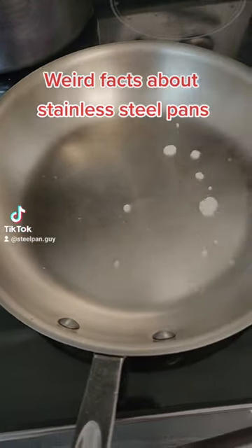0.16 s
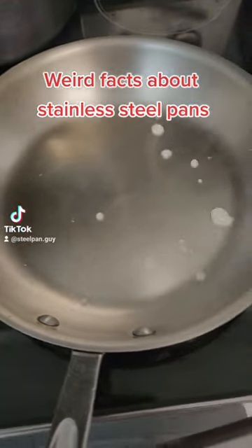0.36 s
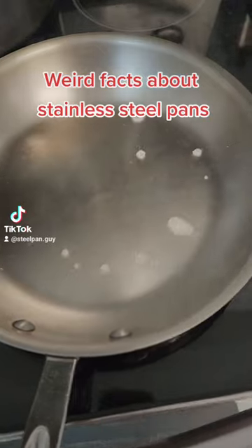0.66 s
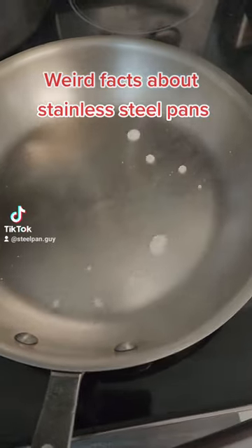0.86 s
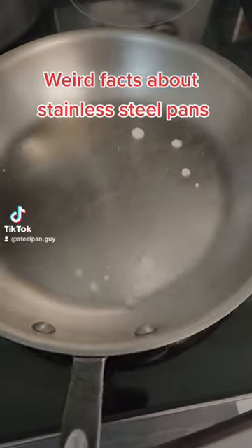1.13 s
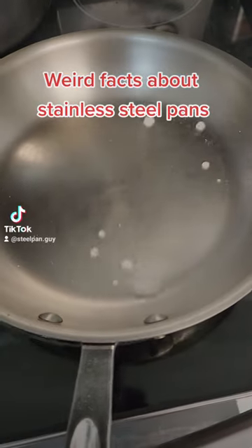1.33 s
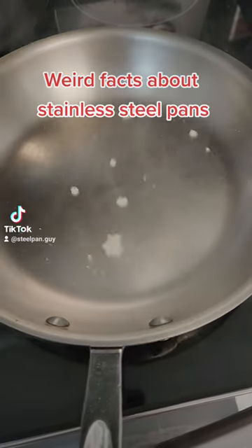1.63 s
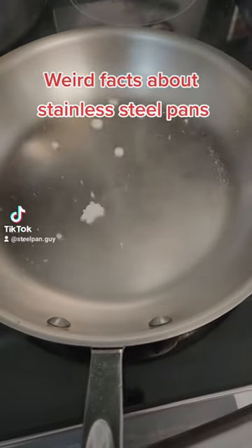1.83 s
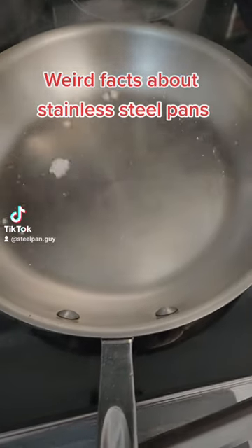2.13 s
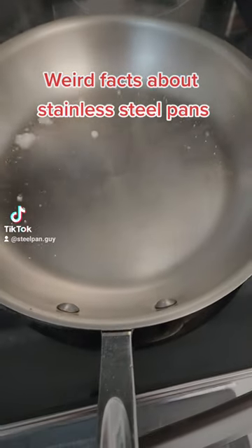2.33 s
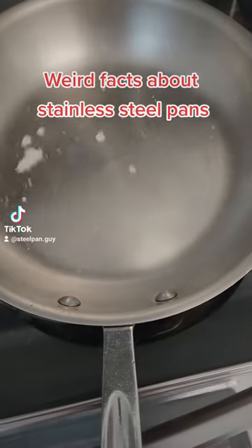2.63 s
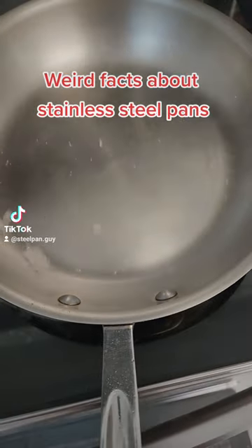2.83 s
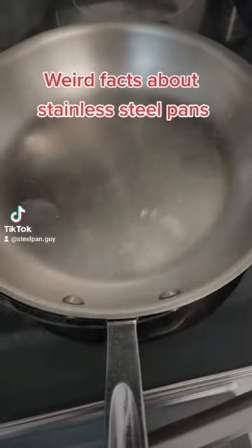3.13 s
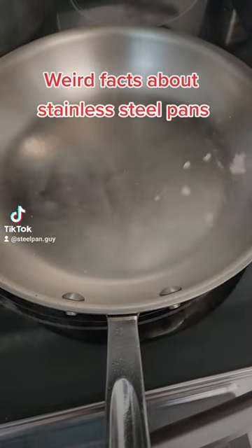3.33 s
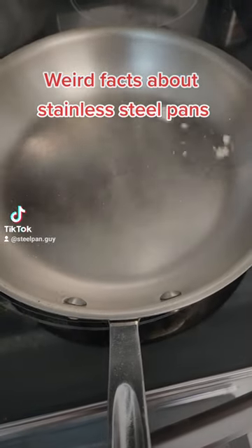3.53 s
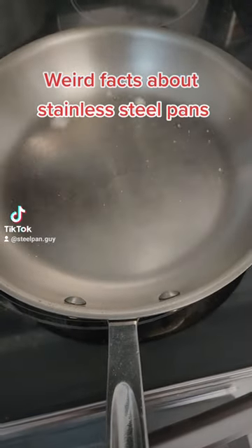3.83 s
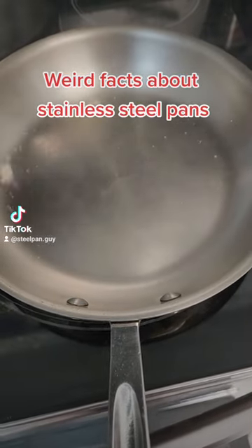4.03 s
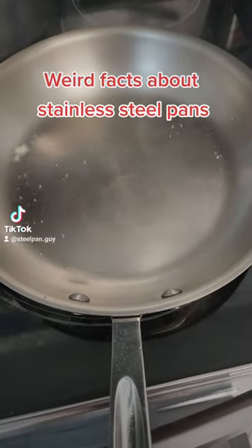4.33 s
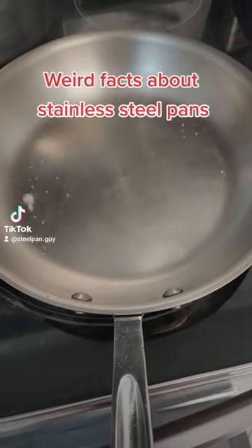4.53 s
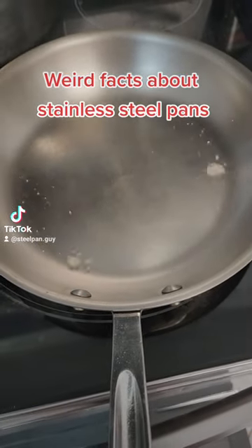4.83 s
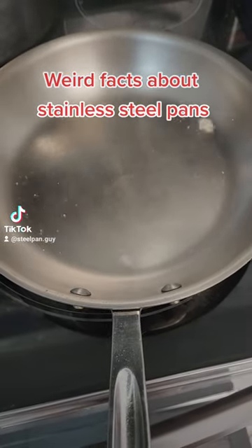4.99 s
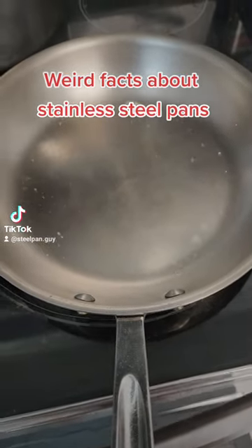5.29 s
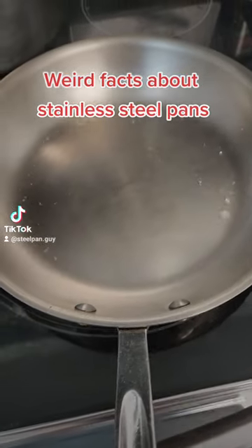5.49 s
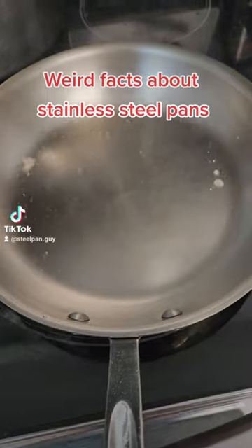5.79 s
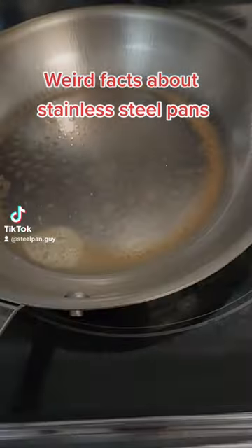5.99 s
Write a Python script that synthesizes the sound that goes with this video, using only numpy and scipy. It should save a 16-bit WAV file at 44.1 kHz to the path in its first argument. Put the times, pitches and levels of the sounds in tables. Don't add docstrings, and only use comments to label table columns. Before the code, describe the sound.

From 0 s a bright, dense steam hiss fills the close stereo view, somewhat left of centre, fluttering finely, with grainy crackle and a faint ringing of hot steel beneath. Low kitchen rumble sits behind. At 0.29 s something is set down hard on the counter to the right: a firm woody knock with a tight double bounce and short rattle. A soft bump comes near 1 s, another faint one at 1.95 s, when the sizzle swells. Around 2.9-3.1 s the hiss surges sharply, with snapping spits and metallic pings, then a soft booming stove thud at 3.08 s. Sizzling continues, gradually thinner, with a dull bump at 3.7 s and isolated spits at 3.84, 4.2, 4.7 and a cluster at 5.05-5.2 s. At 5.96 s it cuts to silence; at 6.03 s a low pan knock arrives with a duller sizzle dying almost immediately.

```python
import sys
import numpy as np
from scipy import signal
from scipy.fft import rfft, irfft, next_fast_len
from scipy.io import wavfile
from scipy.ndimage import uniform_filter1d, map_coordinates

SR = 44100
rng = np.random.default_rng(int(sys.argv[2]) if len(sys.argv) > 2 else 0)


def digitize_waveform(pressure):
    field = np.atleast_2d(pressure).T
    bounded = np.clip(field, -1, 1)
    quanta = np.round(bounded * 32767).astype(np.int16)
    wavfile.write(sys.argv[1], SR, quanta)


def volts(x):
    e = np.asarray(x, float) / 20
    return 10 ** e


N = 271215

# time_s, steam_db, left_right_db
BOILING = [(0.0, -28, 3.5), (0.68, -29.5, 3.5), (0.93, -30, 6), (1.94, -27.5, 4), (2.6, -29.5, 4.5),
           (2.73, -30.5, 5.5), (2.95, -21, 6.5), (3.12, -28.5, 5.5), (3.35, -28.5, 6.0), (3.48, -28.5, 5.5),
           (3.71, -26.5, 3.5), (3.79, -30.5, 4), (4.39, -29.5, 6), (4.84, -31.5, 6.0), (4.92, -31.5, 4.0),
           (5.55, -29.5, 3.5), (5.65, -32, 3.0), (5.95, -31.5, 5.5)]
# pitch_hz, density_db (per Hz)
STEAM_COLOUR = [(1350, -28), (2300, -8.5), (2720, -8), (2950, -1.5), (3490, -4), (4160, -2.5), (4570, -5.5),
                (4800, -3), (6210, -4.5), (7290, -1.5), (8220, -4), (11800, 0), (13600, -0.5), (14700, 3.5),
                (15600, -3)]
# pitch_hz, density_db (per Hz)
STEEL_COLOUR = [(240, -51), (400, -11), (487, -21), (571, -7), (623, -14.5), (718, -7.5), (1000, -12),
                (1330, -3), (1890, -7), (2160, 0.5), (2700, -6.5), (3440, -12), (5830, -120)]
# start_s, level_db, contact_s
SET_DOWN_BLOWS = [
    (.2878, -21, 0.0003),
    (.2925, -16.5, 0.0007),
    (.2985, -17.5, 0.002),
    (.3425, -29, 0.0025),
]
# start_s, level_db, contact_s
STOVE_BLOWS = [
    (3.0795, -15.5, 0.003),
]


def unit(x):
    return x / np.sqrt(np.mean(x ** 2) + 1e-20)


def level(pair):
    return pair / np.sqrt(np.mean(pair.mean(0) ** 2))


def along(points, hz):
    f, v = np.transpose(points)
    return np.interp(np.log(hz + 1), np.log(f + 1), v)


def curves(rows):
    s, *cols = np.transpose(rows)
    return [np.interp(np.arange(N) / SR, s, c) for c in cols]


def wobble(rate):
    knots = rng.standard_normal(int(N * rate / SR) + 4)
    return map_coordinates(knots, [np.arange(N) * rate / SR])


def filtered(x, response):
    m = next_fast_len(N + SR // 2)
    return irfft(rfft(x, m) * response(np.fft.rfftfreq(m, 1 / SR)), m)[..., :N]


def ports(pair, colour):
    # pitch_hz, likeness (0 to 1)
    likeness = [(60, 1), (250, 0.99), (500, 0.77), (950, 0.29), (1700, 0.49), (2100, 0.44), (3300, 0.17),
                (5000, 0.23), (15000, 0.075)]
    # pitch_hz, left_right_db
    tilt = [(60, 0.5), (130, 3), (290, -2.5), (640, 2), (1410, 5), (3100, -4), (6820, 2.5), (15000, -1)]
    # pitch_hz, lead_radians
    lead = [(60, 0), (250, .05), (500, .7), (950, 2), (1500, 2.6), (2070, 7.6), (2900, 10), (3500, 9.8),
            (6000, 13.5), (16000, 30)]

    def spread(hz):
        turn = np.arccos(np.clip(along(likeness, hz), -1, 1)) / 2
        return colour(hz) * [np.cos(turn), np.sin(turn)]

    sign = np.array([[.5], [-.5]])
    mid, side = filtered(pair, spread)
    both = np.array([mid + side, mid - side])
    return filtered(both, lambda hz: volts(sign * along(tilt, hz)) * np.exp(1j * sign * along(lead, hz)))


def dying(x, decays):
    hz, t, z = signal.stft(rng.standard_normal((2, SR)), SR, nperseg=128)
    fade = volts(-60 * t / along(decays, hz)[:, None])
    tail = signal.istft(z * fade, SR, nperseg=128)[1]
    return signal.fftconvolve(x[None], tail / np.linalg.norm(tail[0]), axes=1)[:, :N]


def crackle(spread_db, patchy_db, pops=0, pop_db=0):
    starts = (rng.random(N) < pops / SR) * volts(pop_db + 5.2 * rng.standard_normal(N))
    pop_decay = volts(-60 * np.arange(300) / SR / 0.0038)
    popping = signal.fftconvolve(starts, pop_decay)[:N]
    bursts = rng.standard_normal((2, N)) * (volts(spread_db * rng.exponential(size=N)) + popping)
    z = signal.stft(bursts, nperseg=512)[2]
    field = rng.standard_normal(z.shape[1:])
    field = uniform_filter1d(uniform_filter1d(field, 8, 0), 8, 1)
    return signal.istft(z * volts(patchy_db * unit(field)), nperseg=512)[1][:, :N]


def steam_response(hz):
    return volts(along(STEAM_COLOUR, np.minimum(hz, 15500)))


def air():
    # pitch_hz, density_db (per Hz)
    hum_colour = [(12, -47), (20, 5.5), (80, 0.5), (170, -7), (266, -5), (374, -1), (415, -11), (574, -6.5),
                  (626, -6.5), (730, -3), (1200, -22), (1560, -1), (2640, -120)]
    start_db, follows, fades_db_per_s = -46.5, 0.55, 0.5
    rumble = level(ports(crackle(spread_db=0.5, patchy_db=1.1), lambda hz: volts(along(hum_colour, hz))))
    steam_db = curves(BOILING)[0]
    swing_db = steam_db - np.median(steam_db)
    air_db = start_db + follows * swing_db - fades_db_per_s * np.arange(N) / SR
    return volts(air_db + 0.19 * wobble(4.4)) * rumble


def kitchen(x):
    # pitch_hz, t60_s
    room_decay = [(60, 0.72), (250, 0.21), (1000, 0.51), (4000, 0.17), (12000, 0.037)]
    return ports(dying(np.pad(x, (300, 0)), room_decay), np.ones_like)


def struck(blows, modes, scatter_db):
    struck_sound, t = np.zeros(N + SR), np.arange(SR) / SR
    for s, db, contact in blows:
        ring = np.zeros(SR)
        for hz, mode_db, t60 in modes:
            decay = volts(mode_db + scatter_db * rng.normal() - 60 * t / t60)
            ring += decay * np.sin(2 * np.pi * hz * t) / (1 + (0.19 * hz * contact) ** 2)
        struck_sound[round(s * SR):][:SR] += volts(db) * ring * (1 - np.exp(-t / contact))
    return struck_sound[:N]


def counter_bang():
    # pitch_hz, level_db, t60_s
    counter_modes = [(58, -19, 0.46), (81.5, -1.5, 0.66), (124, 2, 0.18), (194, -9, .08), (229, -6, 0.08),
                     (271, 2, 0.046), (320, 9, 0.036), (423, -6, 0.27), (496, 3.5, 0.079), (610, 6, 0.06),
                     (642, 6.5, 0.058), (728, 2.5, 0.061), (770, 9.5, 0.037), (1022, 0, 0.07),
                     (1180, 9.5, 0.041), (1422, -4, 0.11), (1940, -13, .05), (2940, -14, .04)]
    return -struck(SET_DOWN_BLOWS, counter_modes, scatter_db=3.5)


def stove_thuds():
    # pitch_hz, level_db, t60_s
    stove_modes = [(71, -11.5, 0.91), (87, -11.5, 0.51), (117.3, 1.5, 0.14), (130, -1.5, 0.17),
                   (229, -14.5, 0.25), (322, -9.5, 0.17), (358, -14.5, 0.31), (834, -23, 0.12)]
    return struck(STOVE_BLOWS, stove_modes, scatter_db=-3.0)


def shelf_bumps():
    # pitch_hz, level_db, t60_s
    shelf_modes = [(77.5, -20.5, 0.53), (141.6, -3, 0.1), (170, -7.5, 0.13), (340, -14, .08)]
    # start_s, level_db, contact_s
    bumps = [
        (.981, -17, 0.011),
        (1.946, -37, 0.0036),
        (1.966, -24, 0.0021),
        (2.86, -41.5, 0.0049),
        (3.682, -26, 0.0074),
        (4.34, -37, 0.0033),
    ]
    return struck(bumps, shelf_modes, scatter_db=-1.0)


def hob_knock():
    # pitch_hz, level_db, t60_s
    hob_modes = [(50, -12, .3), (84, 2, 0.6), (162, 5.5, 0.049), (255, -3, 0.08), (340, -9.5, 0.074),
                 (1600, -15, 0.25), (1906, -31, .2)]
    # start_s, level_db, contact_s
    knock = [
        (6.0264, -19, 0.0014),
    ]
    return struck(knock, hob_modes, scatter_db=5.0)


def clatter(blows, db):
    # pitch_hz, density_db (per Hz)
    clatter_colour = [(45, -42), (110, -5), (312, -1), (465, -5), (544, -3.5), (658, 0.5), (1740, -6.5),
                      (2930, -21), (3800, -30), (4940, -65), (8360, -120)]
    # pitch_hz, t60_s
    damping = [(60, 0.23), (250, 0.59), (1000, 0.24), (3000, 0.037), (8000, 0.018)]
    hits = np.zeros(N)
    for s, blow_db, contact in blows:
        hits[round(s * SR) + 60] = volts(blow_db + db)
    return ports(dying(hits, damping), lambda hz: volts(along(clatter_colour, hz)))


def last_hiss():
    # pitch_hz, density_db (per Hz)
    dull_colour = [(120, -33), (200, -9), (339, -10.5), (393, -21), (666, -13.5), (1090, -19), (1630, -13),
                   (2220, -14.5), (3370, -19), (15600, -29)]
    start_s, start_db, falls_db_per_s = 6.006, -24, 126
    stream = crackle(spread_db=1.1, patchy_db=-1.5)
    hiss = level(ports(stream, lambda hz: volts(along(dull_colour, np.minimum(hz, 15500)))))
    return volts(start_db - falls_db_per_s * np.maximum(np.arange(N) / SR - start_s, 0)) * hiss


def spits():
    # start_s, peak_db, ping_db (of the steel)
    bursting = [(1.0944, -24, -35), (1.5484, -27, -28), (2.485, -1, -26), (2.8996, -18, -14),
                (2.95, -5, -9), (2.9655, 2, -15), (2.9994, -1, -21), (3.028, -16, -7), (3.0552, -1, 0.5),
                (3.8397, -2.5, -13), (4.0294, -17, -29), (4.2004, -15, -27), (4.7174, -22, -25),
                (4.742, -18, -23), (5.056, -6, -25), (5.0624, -7, -21), (5.1233, -8, -24),
                (5.222, -10, -30)]
    puffs, pings, t = np.zeros((2, N)), np.zeros((2, N)), np.arange(SR // 20) / SR
    for s, db, ping_db in bursting:
        click = volts(db - 3.5 - 60 * t / 0.0009)
        tail = volts(db - 20.0 - 60 * t / 0.01)
        puff = (click + tail) * rng.standard_normal((2, len(t)))
        puffs[:, round(s * SR):][:, :len(t)] += puff * volts(2.5)
        pings[:, round(s * SR):][:, :len(t)] += puff * volts(ping_db + 11.5)
    return ports(puffs, steam_response) + ports(pings, lambda hz: volts(along(STEEL_COLOUR, hz)))


def touches():
    # centre_s, extra_ringing_db, extra_steam_db (negative: less), half_length_s
    touching = [(0.056, 4, 1.5, 0.11), (.3, 15, -2, 0.011), (0.514, -3.5, 1, 0.13), (1.134, 3, 1.5, 0.098),
                (1.462, 1, 1.5, 0.1), (1.863, 2, 0.5, 0.052), (2.223, -2.5, 0, 0.031),
                (2.484, -2.5, 0.5, 0.057), (2.72, 2.5, 2, 0.063), (2.974, 6.5, 0.5, 0.079),
                (3.335, -0.5, 1.5, 0.054), (4.023, 1, 2.5, 0.044), (4.36, 2.5, 2.5, 0.048),
                (4.96, 0.5, 1.5, 0.1), (5.056, -3, 2.5, 0.039), (5.507, 0.5, 0.5, .06)]
    t = np.arange(N) / SR
    extra_db = np.zeros((2, N))
    for s, ring_db, steam_db, half in touching:
        extra_db += np.outer([ring_db, steam_db], np.exp(-((t - s) / half) ** 2))
    return extra_db


def steel_response(hz):
    # pitch_hz, width_hz, level_db
    resonances = [
        (910, 34, 7),
        (2120, 450, -5.5),
        (4040, 120, -12),
        (7370, 510, 16),
    ]
    peaks = sum(volts(db) * width / np.hypot(2 * (hz - centre), width) for centre, width, db in resonances)
    return volts(along(STEEL_COLOUR, hz)) * (1 + .5 * peaks)


def sizzle():
    ring_start_db, ring_follows, cooling_db_per_s = -37.5, 0.52, 0.97
    bright_db, dulls = -1.5, 0.16
    boil_db, pan_db = curves(BOILING)
    ping_db, flare_db = touches()
    steam_db = boil_db + flare_db
    swing_db = steam_db - np.median(steam_db)
    ring_db = ring_start_db + ring_follows * swing_db - cooling_db_per_s * np.arange(N) / SR + ping_db
    flutter_db = .5 * wobble(6.465) + 0.18 * wobble(14) + 0.5 * wobble(45) + 0.093 * wobble(150)
    steam = level(ports(crackle(spread_db=0.53, patchy_db=0.3, pops=83, pop_db=-3.0), steam_response))
    top = filtered(steam, lambda hz: np.clip(np.log2(hz / 6000 + 1e-9), 0, 1.4) / 1.4)
    steam = steam + (volts(bright_db - dulls * swing_db) - 1) * top
    ring = level(ports(crackle(spread_db=0.9, patchy_db=1.0, pops=63, pop_db=-1.5), steel_response))
    drift = volts(np.outer([.5, -.5], pan_db - .6))
    return volts(steam_db + 2.0 + flutter_db) * drift * steam + volts(ring_db + 1.62 * flutter_db) * ring


def scene():
    bang = counter_bang()
    thuds = stove_thuds() + shelf_bumps() + hob_knock()
    direct = ports(np.outer([1, -.5], bang + thuds), np.ones_like)
    rattles = clatter(SET_DOWN_BLOWS, db=32) + clatter(STOVE_BLOWS, db=17.5)
    room = volts(-15.5) * kitchen(bang) + volts(-20.0) * kitchen(thuds)
    hiss = np.where(np.arange(N) < 6 * SR, sizzle(), last_hiss())
    return air() + room + direct + rattles + spits() + hiss


def top_cut(x):
    return signal.sosfilt(signal.butter(12, 16960, fs=SR, output="sos"), x)


def record(dry):
    mute_s, fade_s, resume_s, rise_s = 5.955, .014, 6.0257, .002
    soft = dry / (1 + np.abs(dry / .95) ** 6) ** (1 / 6)
    limited = filtered(soft, lambda hz: (hz < 15930) * (1j * hz / (35 + 1j * hz)) ** 2)
    t = np.arange(N) / SR
    depth = np.clip(np.minimum((t - mute_s) / fade_s, (resume_s - t) / rise_s), 0, 2)
    return top_cut(limited * volts(-60 * depth))


dry = scene()
out = record(dry)
digitize_waveform(out)
```